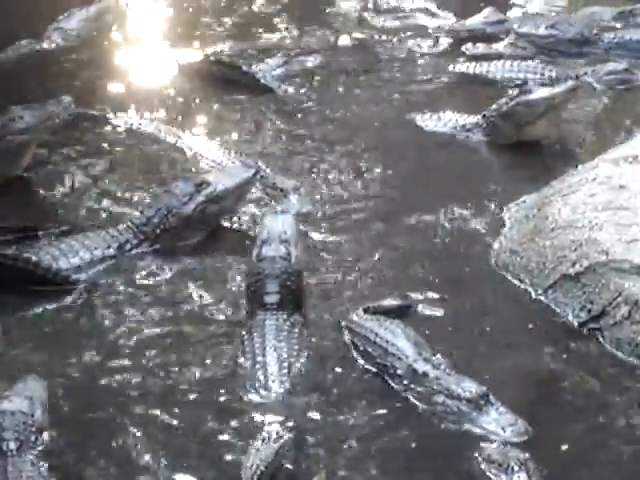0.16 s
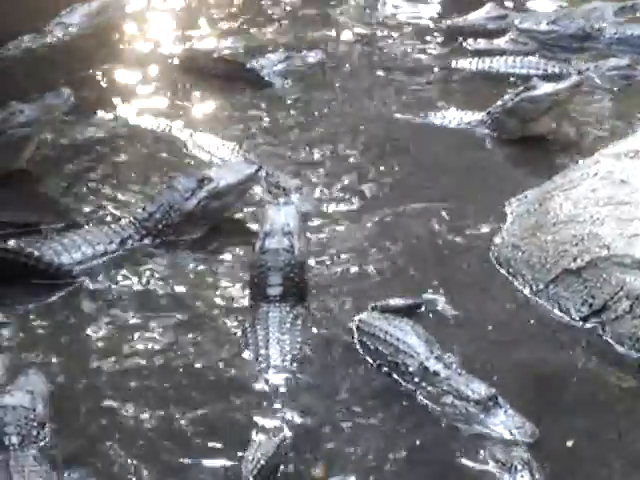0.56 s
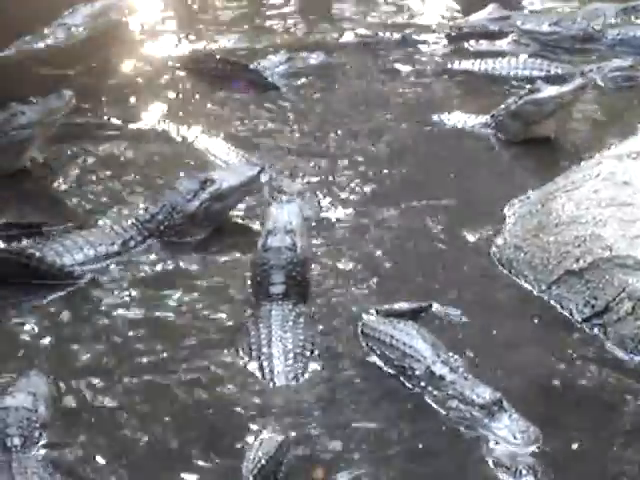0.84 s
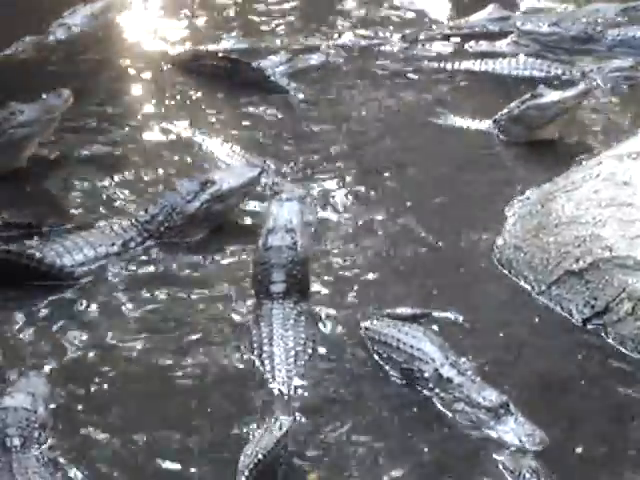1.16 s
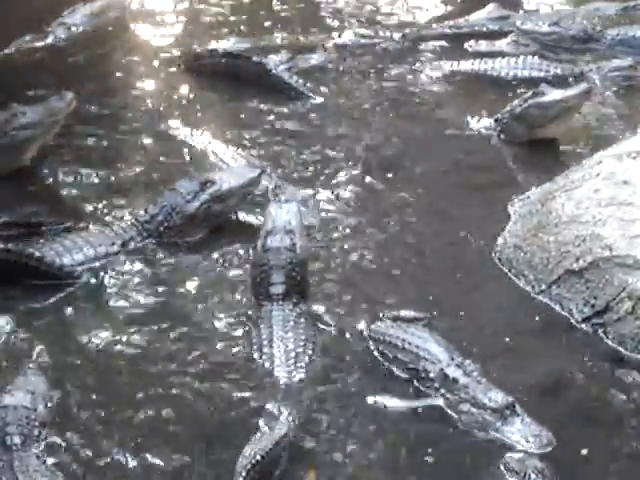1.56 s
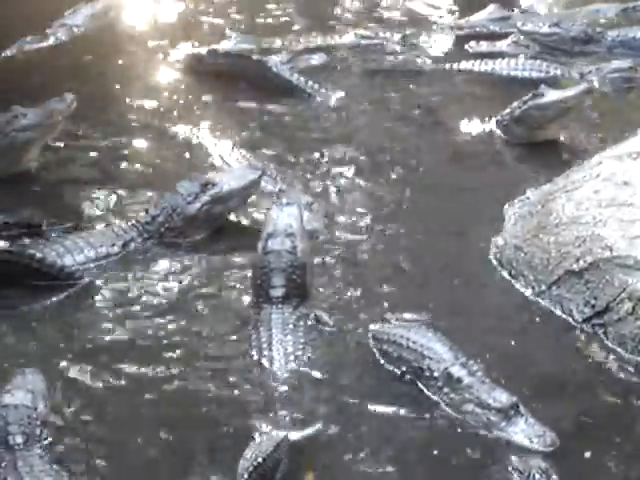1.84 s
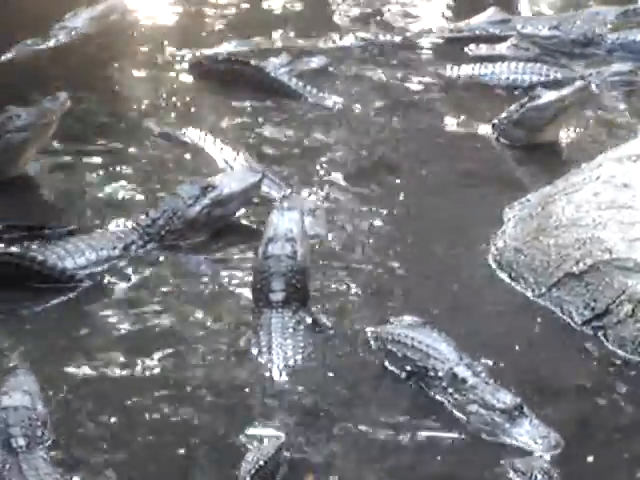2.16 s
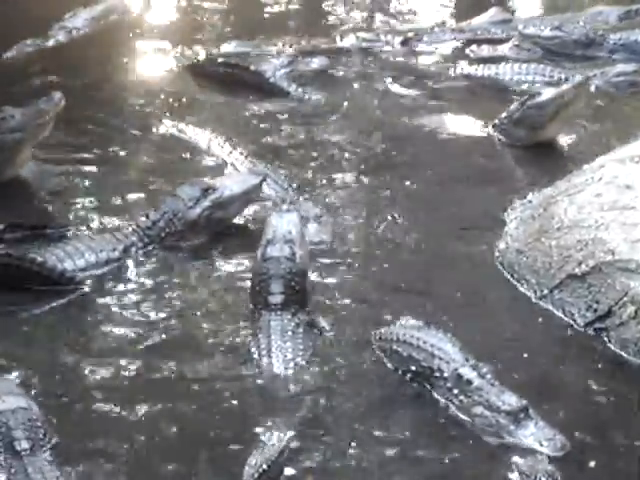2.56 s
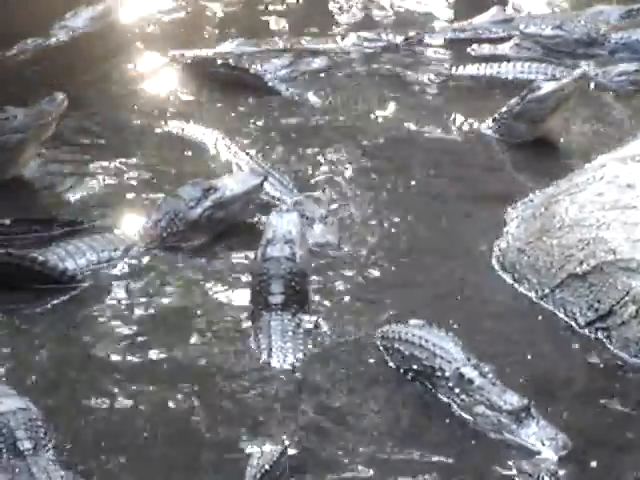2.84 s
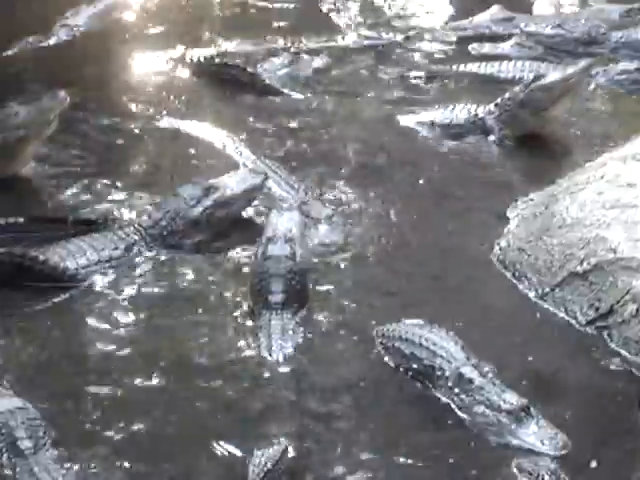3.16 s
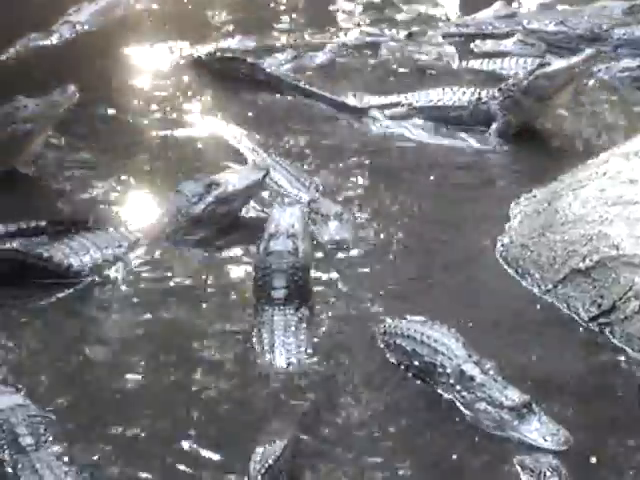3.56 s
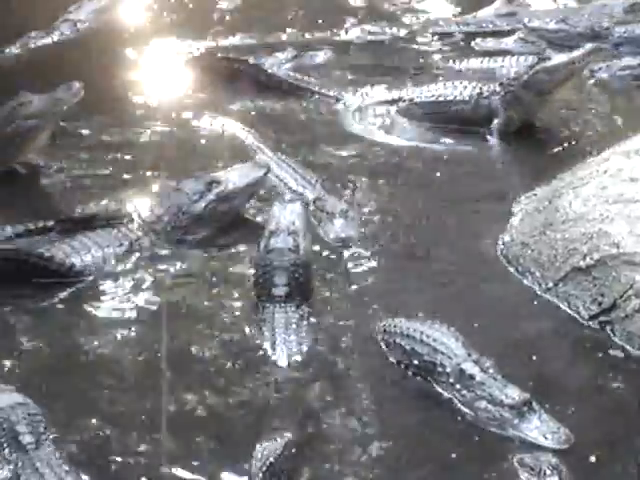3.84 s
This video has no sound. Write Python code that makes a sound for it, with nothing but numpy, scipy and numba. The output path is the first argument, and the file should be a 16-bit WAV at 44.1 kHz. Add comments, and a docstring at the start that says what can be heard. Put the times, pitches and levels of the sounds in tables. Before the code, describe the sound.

Low throbbing alligator bellows dominate after a quieter opening of bird phrases, insect clicking and a plop of water; spray hisses, high rasping tones run, and another hoarse bellow starts at the end, outdoors, mono, slightly dull.

```python
"""Alligators bellow in turn in a shallow pond: throat pulses and gated air excite throat resonances.
From the start come the end of one bellow, whistled bird phrases and a clicking insect; then splashes
of ringing bubbles and a far bellow. Next two animals bellow over noise of spray and nostril hiss, a run
of short rasping high tones enters, a third bellow and a growl join, and a later bellow closes the scene.
Echoes, a thin steady sine tone and the hush of the park, noise filtered in bands, lie behind throughout."""
import sys
import numpy as np
from scipy import signal
from scipy.io import wavfile
from numba import njit

SR = 44100
rng = np.random.default_rng(int(sys.argv[2]) if len(sys.argv) > 2 else 0)


def unload_wav(signal):
    """Save mono or channel-first audio to the path in sys.argv[1] as 16-bit WAV at rate SR, clipped to [-1, 1]."""
    wavfile.write(
        sys.argv[1],
        SR,
        np.round(np.clip(np.atleast_2d(signal).T, -1, 1) * 32767).astype(np.int16),
    )


def voltage_ratio(decibels):
    """Convert decibels (scalar or array-like) to amplitude ratios, 20 dB per decade."""
    exponent = np.asarray(decibels, float) / 20
    return 10 ** exponent


N = 176400
TIME = np.arange(N) / SR


def rms_one(x):
    """Normalisation to unit root-mean-square level."""
    return x / np.sqrt(np.mean(x ** 2) + 1e-20)


def in_time(rows):
    """Linear interpolation of each column of a table whose first column is time in s."""
    s, *columns = np.transpose(rows)
    return [np.interp(TIME, s, c) for c in columns]


def drift(rate_hz):
    """Random fluctuation of unit rms: white noise through a two-pole low-pass."""
    r = np.exp(-2 * np.pi * rate_hz / SR)
    noise = rng.standard_normal(N + SR)
    return rms_one(signal.lfilter([1], [1, -2 * r, r * r], noise)[SR:])


def lowpass(x, hz):
    """Second-order low-pass: attenuation grows above the corner frequency."""
    return signal.sosfilt(signal.butter(2, min(hz, .45 * SR), fs=SR, output="sos"), x)


def highpass(x, hz):
    """Second-order high-pass: attenuation grows below the corner frequency."""
    return signal.sosfilt(signal.butter(2, hz, "high", fs=SR, output="sos"), x)


@njit
def resonate(x, cosine, r):
    """Two-pole resonance whose centre may move; gain 1 at the peak."""
    y = np.zeros(len(x))
    for i in range(2, len(x)):
        y[i] = (1 - r * r) / 2 * (x[i] - x[i - 2]) + 2 * r * cosine[i] * y[i - 1] - r * r * y[i - 2]
    return y


def resonance(x, hz, width_hz):
    """Damped resonator: the pole angle sets its frequency, the pole radius its bandwidth."""
    cosine = np.cos(2 * np.pi * hz / SR) * np.ones(len(x))
    return resonate(x + 1e-18, cosine, np.exp(-np.pi * width_hz / SR))


def double_resonance(x, hz, width_hz):
    """Two equal resonators in cascade, which steepen the skirts of the peak."""
    return resonance(resonance(x, hz, width_hz), hz, width_hz)


def coloured(spectrum, patchy_db):
    """Noise shaped by spectral density in narrow bands, each flickering on its own; rms 1."""
    hz, db = np.transpose(spectrum)
    out, white = 0, rng.standard_normal((2, N + SR // 4))
    edges = np.geomspace(22, 10500, 28)  # about a third of an octave apart
    for k, (low, high) in enumerate(zip(edges, edges[1:])):
        band_pass = signal.butter(2, [low, high], "band", fs=SR, output="sos")
        band = signal.sosfilt(band_pass, white[k % 2])[SR // 4:]
        band_db = np.interp(np.log(low * high) / 2, np.log(hz), db, left=-60)
        out = out + band * voltage_ratio(band_db + patchy_db * drift(37.0))
    return rms_one(out)


def diffuse_echoes(x, t60_s, cut_hz):
    """Diffuse reverberation from banks and trees: convolution with exponentially decaying noise."""
    t = np.arange(SR) / SR
    rise = np.minimum(t / 0.028, 1)
    tail = lowpass(rng.standard_normal(SR), cut_hz) * voltage_ratio(-60 * t / t60_s) * rise
    tail = highpass(tail, 260)
    return signal.fftconvolve(x, tail / np.sqrt(np.sum(tail ** 2)))[:N]


def bellow(rate_rows, effort_rows, throat, rough, jitter, uneven_db, soft_hz):
    """Source-filter voice: one pulse per throat closing and air gated each cycle excite resonances."""
    release_s = 0.1
    (rate,), (db, tuning) = in_time(rate_rows), in_time(effort_rows)
    start, end = rate_rows[0][0], rate_rows[-1][0]
    turns = np.cumsum(rate * (1 + jitter * drift(28.1)) * (TIME > start)) / SR
    pulses = (np.diff(np.ceil(turns), prepend=0) > 0) * voltage_ratio(uneven_db * drift(28))
    gate = .3 + np.exp(-3.0 * (turns % 1))  # most open at each closing pulse
    air = highpass(rng.standard_normal(N) * gate * (TIME > start), 160)
    pulses = pulses * np.sqrt(SR / rate)  # equal power at any rate
    source = lowpass(np.sqrt(1 - rough) * pulses + np.sqrt(rough) * air, soft_hz)
    voice = 0
    for hz, width_hz, level_db in throat:
        ringing = double_resonance(source, hz * tuning, width_hz)
        voice = voice + voltage_ratio(level_db) / np.sqrt(width_hz) * ringing
    sounding = (TIME > start) & (TIME < end)
    voice = voice / np.sqrt(np.mean(voice[sounding] ** 2))
    return voice * voltage_ratio(db) * np.clip((end + release_s - TIME) / release_s, 0, 1)


def near_alligator():
    """Almost pure pulse excitation gives clean clicks; a mouth resonance sinks as the jaws close."""
    # nominal throat pulse rate: time_s, rate_hz
    pulse_rate = [(1.866, 41.5), (1.94, 41), (2.0, 45), (2.06, 48), (2.1, 51.3), (2.18, 52.1), (2.28, 51.5),
                  (2.36, 50.8), (2.43, 50.0), (2.632, 46.3), (2.788, 43.3), (2.85, 41.1), (3.0, 38.2),
                  (3.3, 36)]
    # effort and tuning of the resonances: time_s, level_db, tuning_factor
    effort = [(1.867, -36.5, 0.99), (1.949, -42, 0.96), (2.102, -34, 1.0), (2.3, -33.5, 0.95),
              (2.5, -34, 0.96), (2.7, -36, 0.94), (2.9, -42, 1.0), (3.101, -43.5, 0.83), (3.3, -43, 1.0)]
    # throat resonances before tuning: centre_hz, width_hz, level_db
    throat = [(100, 70, 1), (155, 90, 4), (452, 160, 3), (800, 300, 0), (900, 1600, 5), (1750, 160, -7),
              (2230, 160, -6), (2620, 200, -7)]
    # mouth resonance before tuning: time_s, centre_hz
    mouth = [(1.866, 1420), (2.3, 1430), (2.5, 1330), (2.7, 1130), (2.95, 1000), (3.3, 900)]
    throat = throat + [(in_time(mouth)[0], 330, 3.5)]
    return bellow(pulse_rate, effort, throat, rough=.02, jitter=.001, uneven_db=1.0, soft_hz=3500)


def second_alligator():
    """Much turbulent air beside the pulses roughens the voice; a low source cutoff dulls it."""
    # nominal throat pulse rate: time_s, rate_hz
    pulse_rate = [(1.88, 57), (2.05, 58), (2.3, 58), (2.5, 52), (2.7, 46.5), (2.9, 45)]
    # effort and tuning of the resonances: time_s, level_db, tuning_factor
    effort = [(1.88, -34.5, 1.3), (1.919, -27.5, 0.89), (2.049, -26, 0.83), (2.201, -29, 1.055),
              (2.35, -30, 0.72), (2.552, -28, 1.317), (2.7, -32, 1.23), (2.9, -35.5, 0.87)]
    # throat resonances before tuning: centre_hz, width_hz, level_db
    throat = [(53, 51, -11.5), (127, 42, -13), (174, 108, 6.5), (430, 192, 3.5), (552, 127, -2),
              (1071, 190, -7.5)]
    return bellow(pulse_rate, effort, throat, rough=.45, jitter=.015, uneven_db=2, soft_hz=1500)


def third_alligator():
    """Mixed pulse and air excitation gives a rough voice."""
    # nominal throat pulse rate: time_s, rate_hz
    pulse_rate = [(2.7, 46), (2.9, 48.5), (3.05, 52), (3.2, 53.5), (3.45, 51), (3.7, 45)]
    # effort and tuning of the resonances: time_s, level_db, tuning_factor
    effort = [(2.7, -41, 0.47), (2.9, -39, 0.96), (3.099, -35, 0.95), (3.248, -48.5, 0.97),
              (3.45, -44.5, 0.93), (3.7, -56, 0.96)]
    # throat resonances before tuning: centre_hz, width_hz, level_db
    throat = [(51, 35, -9), (105, 50, -12), (290, 50, -3), (450, 150, -1), (700, 320, 0), (1830, 120, -10),
              (2600, 150, -10), (3250, 150, -12)]
    return bellow(pulse_rate, effort, throat, rough=.35, jitter=.012, uneven_db=2, soft_hz=3000)


def growl():
    """Pulses slow enough to be heard singly ring in one low resonance."""
    # nominal throat pulse rate: time_s, rate_hz
    pulse_rate = [(2.869, 20.1), (3.75, 20.1)]
    # effort and tuning of the resonance: time_s, level_db, tuning_factor
    effort = [(2.86, -39, 1.0), (3.0, -41, 1.0), (3.1, -33.5, 1.0), (3.22, -30, 1.0), (3.3, -33, 1.0),
              (3.42, -36.5, 1.0), (3.47, -33.5, 1.0), (3.55, -40, 1.0), (3.75, -48, 1.0)]
    # throat resonance before tuning: centre_hz, width_hz, level_db
    throat = [(235, 60, 0)]
    return bellow(pulse_rate, effort, throat, rough=.05, jitter=.015, uneven_db=1.5, soft_hz=200)


def earlier_alligator():
    """Moving resonances: as the chest swells and sinks and the mouth closes, their peaks shift."""
    # nominal throat pulse rate: time_s, rate_hz
    pulse_rate = [(0.015, 46), (.15, 43.5), (.3, 36.5), (.335, 31), (.37, 28), (.48, 28)]
    # effort and tuning of the resonances: time_s, level_db, tuning_factor
    effort = [(0.015, -32.5, 0.89), (0.15, -40.5, 0.99), (0.3, -39.5, 0.89), (0.37, -46, 0.97),
              (0.42, -50, 0.92), (0.48, -52.5, 1.0)]
    # fixed throat resonances before tuning: centre_hz, width_hz, level_db
    throat = [(124, 38, -4.5), (187, 40, 1), (500, 75, -6)]
    # moving resonances before tuning: time_s, chest_hz, chest_db, mouth_hz, mouth_db
    moves = [(0.0, 300, 5, 546, -0.5), (.07, 289, -7, 593, 6), (.14, 266, 7.5, 558, -1),
             (.22, 254, 7, 540, -12), (.33, 220, 6, 525, -6), (.45, 202, 0, 500, -2.5)]
    chest_hz, chest_db, mouth_hz, mouth_db = in_time(moves)
    throat = throat + [(chest_hz, 80, chest_db), (mouth_hz, 80, mouth_db)]
    return bellow(pulse_rate, effort, throat, rough=.08, jitter=.005, uneven_db=1.5, soft_hz=2000)


def far_alligator():
    """A strongly low-passed source leaves only the low resonances."""
    # nominal throat pulse rate: time_s, rate_hz
    pulse_rate = [(.7, 57), (.8, 55), (1.0, 50), (1.25, 46)]
    # effort and tuning of the resonances: time_s, level_db, tuning_factor
    effort = [(0.7, -58, 0.54), (0.8, -52, 1), (1.0, -57, 0.91), (1.25, -78, 0.92)]
    # throat resonances before tuning: centre_hz, width_hz, level_db
    throat = [(54, 29, 1.5), (109, 44, 1)]
    return bellow(pulse_rate, effort, throat, rough=.15, jitter=.01, uneven_db=1.5, soft_hz=400)


def later_alligator():
    """Strong air noise with irregular pulse periods and strengths makes a hoarse voice."""
    # nominal throat pulse rate: time_s, rate_hz
    pulse_rate = [(3.765, 60), (3.9, 61), (4.0, 58)]
    # effort and tuning of the resonances: time_s, level_db, tuning_factor
    effort = [(3.764, -38, 0.62), (3.8, -35, 1.0), (3.864, -40.5, 0.75), (3.92, -30, 0.94),
              (4.0, -31, 0.99)]
    # throat resonances before tuning: centre_hz, width_hz, level_db
    throat = [(148, 17, -8.5), (227, 240, 4.5), (391, 70, -9.5), (912, 76, -1), (1700, 230, -10),
              (2913, 81, -14), (3800, 2000, -6.5)]
    return bellow(pulse_rate, effort, throat, rough=.45, jitter=.04, uneven_db=3, soft_hz=4000)


def nostrils():
    """Turbulence noise: fluttering air through the near animal's nostrils rings in one moving band."""
    # nostril resonance and hiss: time_s, centre_hz, level_db
    hiss_rows = [(1.9, 4000, -58), (2.1, 4150, -51), (2.35, 4400, -48), (2.5, 4200, -54), (2.62, 3650, -50),
                 (2.9, 3200, -54), (3.3, 3100, -59), (3.4, 3100, -70)]
    hz, db = in_time(hiss_rows)
    air = rng.standard_normal(N) * voltage_ratio(4.5 * drift(25.0))
    hiss = double_resonance(air, hz, 450)
    return voltage_ratio(db) * rms_one(hiss) * (TIME > hiss_rows[0][0]) * (TIME < hiss_rows[-1][0])


def spray():
    """Many fine drops off the shaking backs merge into broadband noise."""
    # spray strength before the common gain: time_s, relative_level_db
    strength = [(1.888, -64), (1.9, -47.5), (2.0, -43), (2.35, -43), (2.6, -46), (2.75, -46.5), (3.15, -54),
                (3.3, -51.5), (3.5, -63), (3.85, -61.5), (3.93, -48), (4.0, -45)]
    # relative spectral density of the mist: frequency_hz, density_db
    mist = [(1060, -29), (1800, -1), (2580, -7), (2880, -8.5), (4250, -7), (5630, -4.5), (9060, -7.5),
            (10100, -6), (13100, -45), (22000, -120)]
    common_gain_db = 6.5
    level = voltage_ratio(in_time(strength)[0] + common_gain_db)
    return (TIME > strength[0][0]) * level * coloured(mist, patchy_db=3.0)


def bubbles(low_hz, high_hz):
    """Impulse excitation: random clicks are dealt to short resonators spread in pitch."""
    per_s, cycles, spread_db = 1800, 6.0, 3.0  # width of a resonator = its pitch / cycles
    strength = voltage_ratio(spread_db * np.minimum(rng.exponential(1, N), 4))
    clicks = (rng.random(N) < per_s / SR) * strength * rng.choice([-1, 1], N)
    dealt = rng.integers(0, 12, N)
    out = 0
    for k, hz in enumerate(np.geomspace(low_hz, high_hz, num=12)):
        out = out + resonance(clicks * (dealt == k), hz, hz / cycles)
    return out


def splashes():
    """Bubble resonance: each splash is a cloud of ringing bubbles under an exponential decay."""
    # splashes: start_s, level_db, decay_t60_s, lowest_bubble_hz, highest_bubble_hz
    splash_rows = [(.522, -35, .8, 540, 800), (.553, -28, .2, 560, 850), (.592, -37, .2, 550, 1400),
                   (.634, -39, .6, 500, 1500), (1.43, -46, .3, 2000, 8000), (3.26, -50, .3, 2600, 3500)]
    onset_s = 0.00088
    out = 0
    for s, db, t60_s, low_hz, high_hz in splash_rows:
        since = np.maximum(TIME - s, 0)
        shape = np.minimum(since / onset_s, 1) * voltage_ratio(db - 60 * since / t60_s)
        out = out + shape * rms_one(bubbles(low_hz, high_hz))
    return out


def birds():
    """Frequency glides: sines sweep linearly in a repeated phrase and single notes, with echoes."""
    # repeats of the phrase: start_s, level_db, slowing_factor
    phrases = [(-.08, -52, 1.0), (.323, -47, 1.0), (.71, -46.5, 1.0), (1.105, -47, 1.2)]
    # notes before slowing: offset_s, length_s, from_hz, to_hz, level_db (within the phrase)
    notes = [(0.0, .06, 3750, 4280, -5), (.052, .13, 4280, 4200, -5), (.142, .016, 3450, 2760, 1),
             (.153, .034, 2770, 2840, 4), (.225, .055, 2240, 2230, 0), (.265, .045, 2300, 2720, -1)]
    # single whistles of other birds and a low rising note: start_s, length_s, from_hz, to_hz, level_db
    singles = [(.472, .04, 950, 1150, -44), (1.065, .04, 3200, 3230, -52), (1.14, .05, 3250, 3200, -54),
               (1.45, .05, 3250, 3400, -52)]
    song = []
    for start, phrase_db, slow in phrases:
        for s, length, from_hz, to_hz, db in notes:
            song.append((start + s * slow, length * slow, from_hz, to_hz, db + phrase_db))
    out = np.zeros(N)
    for s, length, from_hz, to_hz, db in song + singles:
        part = np.clip((TIME - s) / length, 0, 1)
        phase = 2 * np.pi * np.cumsum(from_hz + (to_hz - from_hz) * part) / SR
        swell = np.sin(np.pi * part ** .7) ** .5 * (part < 1)
        out += voltage_ratio(db) * swell * np.sin(phase)
    out *= voltage_ratio(2.5 * drift(90))
    return out + voltage_ratio(-4) * diffuse_echoes(out, .45, cut_hz=8000)


def high_tones():
    """Amplitude modulation by noise: short rasping tones near 6 kHz, each with its own pitch and strength."""
    # strength of the run of tones: time_s, level_db
    run = [(2.1, -61), (2.35, -44), (2.6, -49), (2.68, -50), (2.85, -42), (3.05, -48), (3.2, -42.5),
           (3.33, -46.5), (3.5, -55), (3.6, -55)]
    tones_per_s, tone_s, low_hz, high_hz, rasp_hz = 44, .017, 5650, 6400, 600  # nominal rate
    turns = np.cumsum(tones_per_s * voltage_ratio(2.5 * drift(12))) / SR
    count = turns.astype(int)
    pitch, softness = rng.random((count[-1] + 1, 2))[count].T
    since = TIME - TIME[np.searchsorted(count, count)]
    hz = low_hz + (high_hz - low_hz) * pitch ** 2
    rasp = 1 + 1.3 * rms_one(lowpass(rng.standard_normal(N), rasp_hz))
    shape = np.sin(np.pi * np.minimum(since / tone_s, 1)) * voltage_ratio(-5 * softness)
    tones = rms_one(shape * rasp * np.sin(2 * np.pi * np.cumsum(hz) / SR))
    return voltage_ratio(in_time(run)[0]) * tones * (TIME > run[0][0]) * (TIME < run[-1][0])


def clicking_insect():
    """Resonant radiation: bursts of quick random clicks, parted by weaker gaps, ring in a high band."""
    # buzz: time_s, resonance_hz, level_db
    buzz_rows = [(0.0, 8180, -50), (.06, 8220, -51.5), (.3, 8170, -50), (.45, 8200, -54.5),
                 (.55, 8210, -50.5), (.73, 8160, -53), (.77, 7900, -61), (.8, 8050, -78)]
    clicks_per_s, bursts_per_s, gap_db, width_hz = 1500, 30, -16, 170  # nominal burst rate
    hz, db = in_time(buzz_rows)
    turns = np.cumsum(bursts_per_s * voltage_ratio(3.0 * drift(15))) / SR
    gaps = voltage_ratio(gap_db * (turns % 1 > .65))
    clicks = (rng.random(N) < clicks_per_s / SR) * rng.choice([-1, 1], N) * gaps
    buzz = double_resonance(clicks, hz, width_hz)
    return voltage_ratio(db) * rms_one(buzz) * (TIME < buzz_rows[-1][0])


def park_echoes(near, others):
    """Diffuse reverberation: the voices and splashes return as a dull, decaying tail."""
    return voltage_ratio(-11.5) * diffuse_echoes(voltage_ratio(-6) * near + others, t60_s=.75, cut_hz=2000)


def thin_tone():
    """Simple harmonic motion: one steady sine."""
    # the tone: pitch_hz, peak_level_db
    pitch_hz, level_db = (8032, -66)
    return voltage_ratio(level_db) * np.sin(2 * np.pi * pitch_hz * TIME)


def park_hush():
    """Ambient noise: a sloping spectrum of flickering bands with a slowly changing level."""
    # relative spectral density: frequency_hz, density_db
    spectrum = [(15, -45), (25, -19.5), (53, 0.5), (234, -0.5), (472, 0), (549, 0.5), (907, -2), (1740, -6),
                (2740, -6.5), (4190, -11), (4760, -11), (10100, -19.5), (13100, -53), (22000, -120)]
    # overall strength: time_s, level_db
    strength = [(0.0, -39), (.9, -43), (1.8, -43), (2.5, -38), (4.0, -41)]
    return voltage_ratio(in_time(strength)[0]) * coloured(spectrum, patchy_db=2.0)


def scene():
    """Linear superposition of all sources in one channel."""
    near = near_alligator()
    others = second_alligator() + third_alligator() + growl()
    others = others + earlier_alligator() + far_alligator() + later_alligator()
    others = others + splashes()
    foreground = near + others + nostrils() + birds() + high_tones() + clicking_insect()
    background = spray() + park_echoes(near, others) + thin_tone() + park_hush()
    return (foreground + background)[None]


def low_pass(x):
    """Removes everything above the highest recorded frequency."""
    return signal.sosfilt(signal.butter(12, 10850, fs=SR, output="sos"), x)


def record(dry):
    """Band limitation: a steep low-pass is 60 dB down from 10380 Hz upward."""
    top_cut = signal.cheby2(20, 60, 10380, fs=SR, output="sos")
    mix = signal.sosfilt(top_cut, dry)
    return low_pass(mix)


dry = scene()
out = record(dry)
unload_wav(out)
```